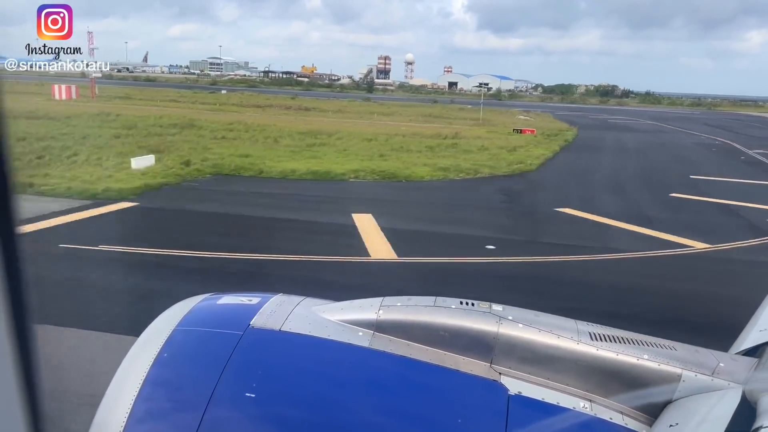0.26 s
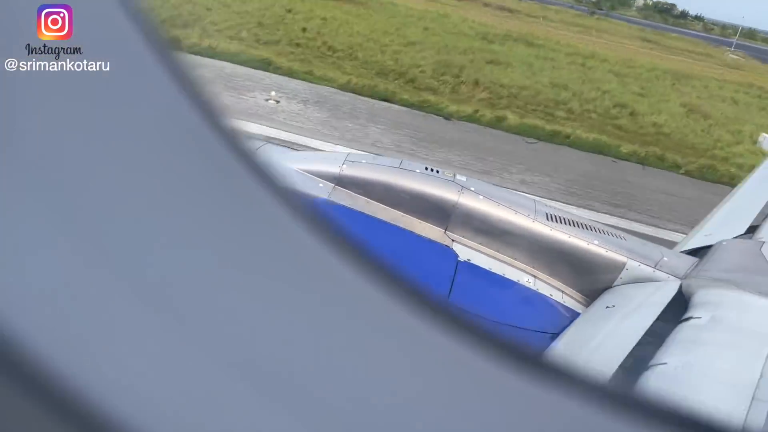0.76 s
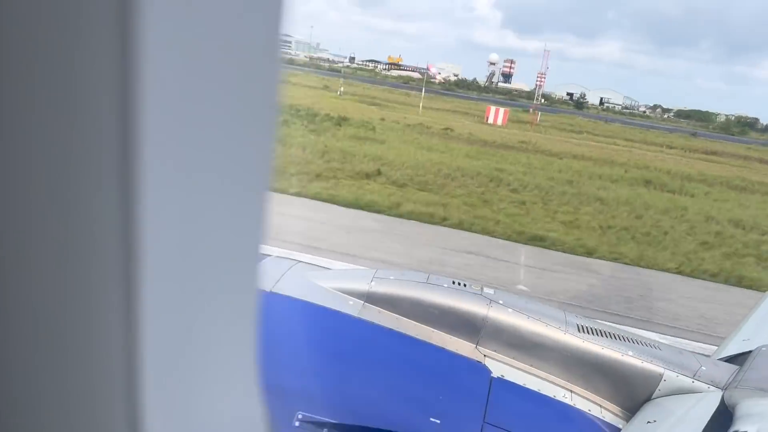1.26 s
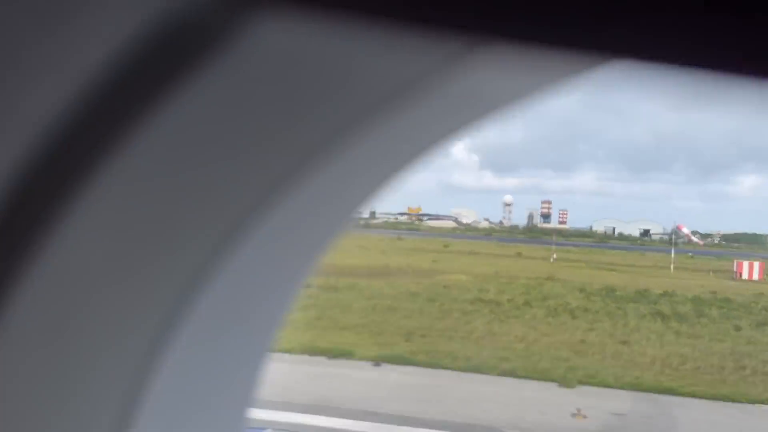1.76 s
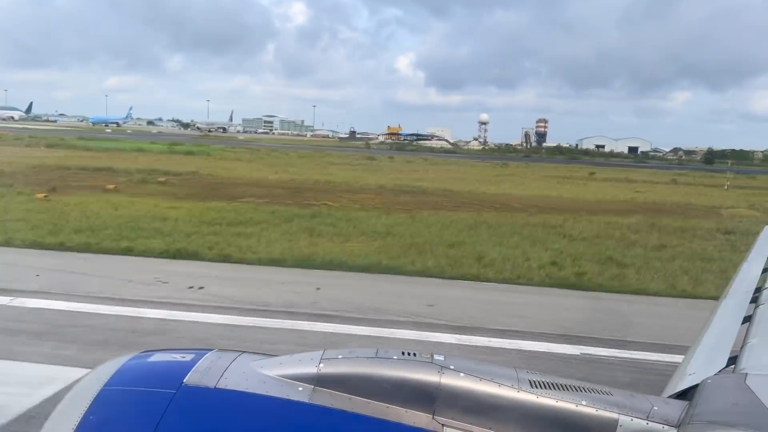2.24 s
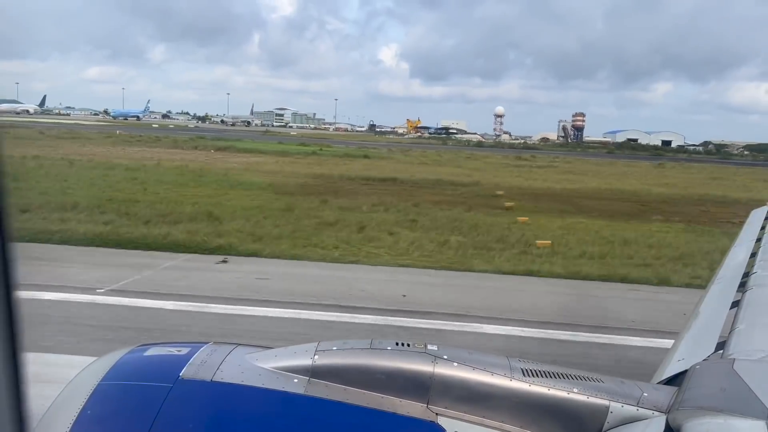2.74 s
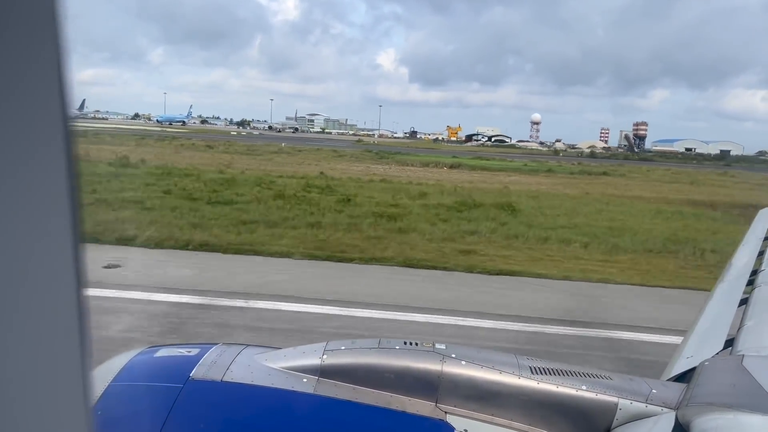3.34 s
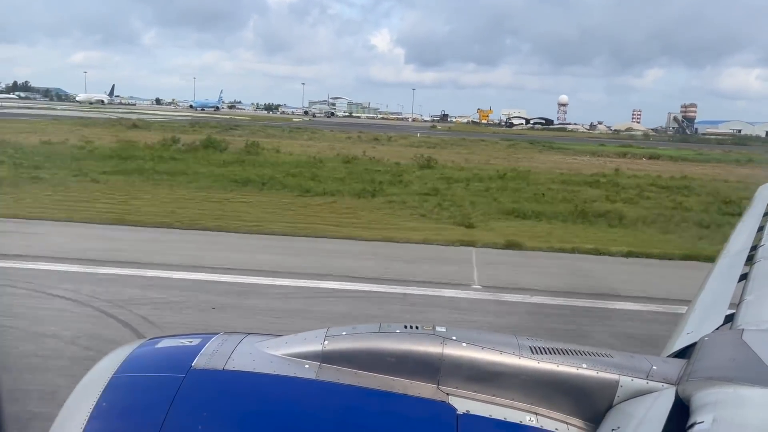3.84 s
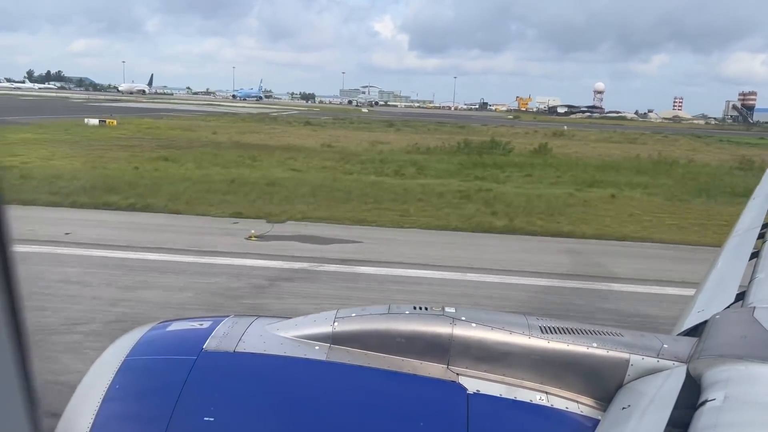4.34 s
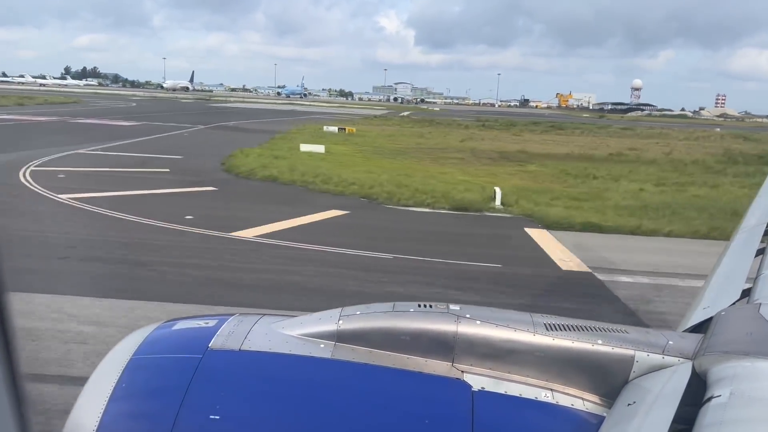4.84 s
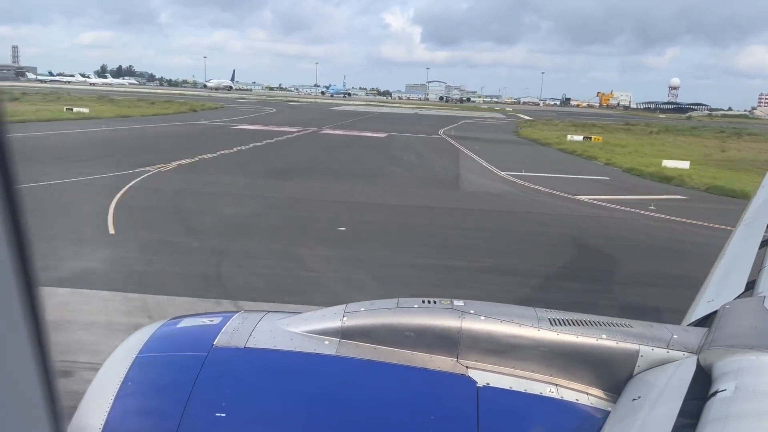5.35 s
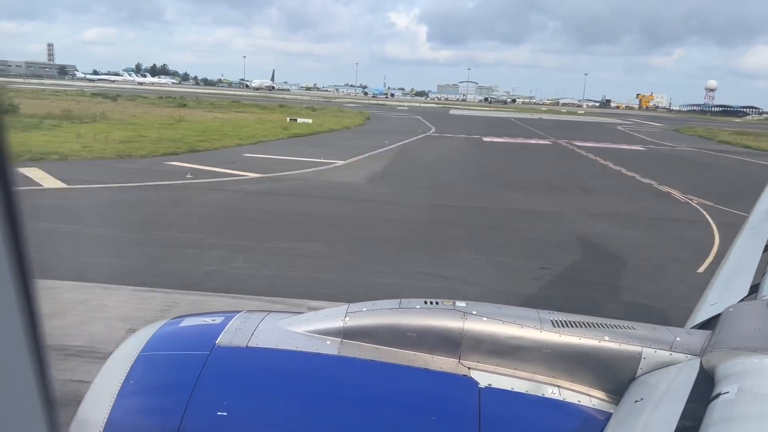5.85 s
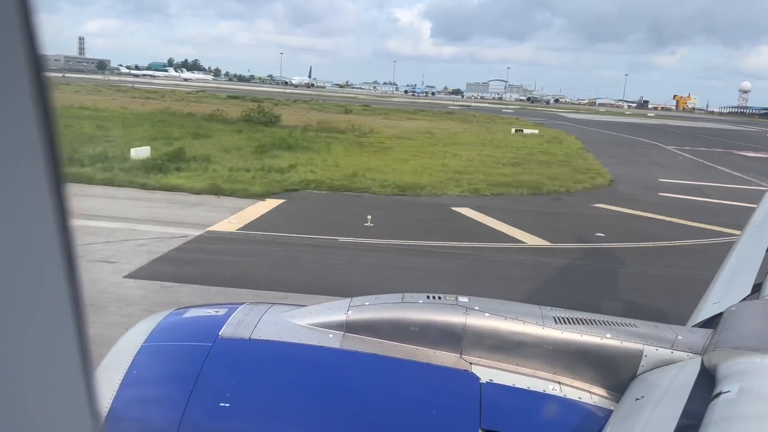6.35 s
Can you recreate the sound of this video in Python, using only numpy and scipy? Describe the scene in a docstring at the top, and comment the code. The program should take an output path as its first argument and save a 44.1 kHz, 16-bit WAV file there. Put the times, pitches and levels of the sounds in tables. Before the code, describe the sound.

Inside an airliner cabin beside the engine, rolling along a runway. Muffled jet roar and rushing air run throughout, slowly easing, with a barely audible thin whine. At 0.27 s the rumble suddenly swells; thumps, scuffing and bright plastic rattling crowd the first second, the heaviest jolt at 0.43 s and a hard, hollow bang with a tiny bounce at 0.58 s. The shaking drops around 1.3 s, then thumps return at 1.7 and 1.8 s. From 2 to 4 s, crisp knocks, ticks and short rattles scatter over the boom, strongest near 2.1, 2.4 and 3.57 s, where a low drone surges. A short squeaky chirp comes at 4.42 s. After 5 s the trim thins, and a deep sway swells near 5.4 to 5.7 s, its drone sinking in pitch; a soft jolt at 6.2 s precedes the fading rumble at 6.6 s. Close, dry stereo, squeaks left of centre.

```python
"""Airliner cabin after landing

Inside an airliner rolling along the runway, at a window beside the engine.
The wheels shake the fuselage: noise bands and gliding sine drones rumble, and decaying modes thump.
Engines and air are coloured noise with a faint sine whine. Shaken trim rattles and scuffs in grains,
knocks and bangs in ringing modes, ticks in noise bursts and squeaks in gliding sines.
A two-port microphone with a limiter hears it all."""
import sys
import numpy as np
from scipy import signal
from scipy.fft import rfft, irfft
from scipy.io import wavfile
from scipy.ndimage import uniform_filter1d, minimum_filter1d

SR = 44100
rng = np.random.default_rng(int(sys.argv[2]) if len(sys.argv) > 2 else 0)


def store_pcm(level_fs):
    """Save levels as 16-bit WAV."""
    pcm = np.round(np.clip(level_fs, -1, 1) * 32767).astype(np.int16)
    wavfile.write(sys.argv[1], SR, np.atleast_2d(pcm).T)


N = 291060
TIME, BINS = np.arange(N) / SR, np.fft.rfftfreq(N, 1 / SR)  # [s], [Hz]

# bright spectrum of the plastic trim: (frequency [Hz], level per Hz [dB])
TRIM = [(500, -17), (1500, -2.5), (3500, -5.5), (6500, 0.5), (9000, -2.5), (11500, -4), (13500, -14.5),
        (16000, 3)]


def gain_of(db):
    """Decibels to gain."""
    return 10 ** (np.asarray(db) / 20)


def evened(x):
    """Scales a signal to unit power."""
    return x / np.sqrt(np.mean(x ** 2) + 1e-20)


def read(points, hz):
    """A table's value at any frequency, interpolated along log frequency."""
    f, value = np.transpose(points)
    return np.interp(np.log(hz + 1), np.log(f + 1), value)


def curves(rows):
    """Each column of a table as a curve over the whole time."""
    s, *columns = np.transpose(rows)
    return [np.interp(TIME, s, c) for c in columns]


def add(mix, s, sound):
    """Lays a sound into the mix from time s, cut off at the mix's end."""
    part = mix[..., max(round(s * SR), 0):][..., :sound.shape[-1]]
    part += sound[..., :part.shape[-1]]


def drift(hz, size=N):
    """Slow random wander of unit power, mostly slower than hz."""
    f = np.fft.rfftfreq(size, 1 / SR)[:size // 20]
    a, b = rng.standard_normal((2, len(f)))
    return evened(irfft((a + 1j * b) * np.exp(-(f / hz) ** 2), size))


def ports(pair, colour):
    """Colours two unrelated signals and blends them as the two microphone ports hear the cabin."""
    # how alike the ports hear: (frequency [Hz], likeness [0-1])
    likeness = [(60, .996), (160, .95), (300, .88), (480, .6), (750, .25), (4000, .2), (7000, .25),
                (8400, .7), (9400, .55), (10200, .92), (16000, .85)]
    # phase by which the left port leads: (frequency [Hz], lead [rad])
    lead = [(0, 0), (430, .1), (900, 2.8), (1800, 3.1), (2500, .7), (7400, .9), (8600, 0), (9800, -3),
            (10400, -3.3), (11600, -6.2), (12700, -6.4), (13200, -9.2), (14000, -9.5), (15400, -12.5)]
    # left minus right: (frequency [Hz], level [dB])
    balance = [(60, 0), (270, -.7), (450, -2.5), (740, .5), (1220, .3), (2000, 2), (3300, 2), (5500, 6.5),
               (9000, .5), (15000, 0)]
    a, b = rfft(pair) * gain_of(read(colour, BINS))
    same = np.clip(read(likeness, BINS), 0, 1)
    right = same * a + np.sqrt(1 - same ** 2) * b
    right = right * np.exp(-1j * read(lead, BINS))
    lean = gain_of(read(balance, BINS) / 2)
    return irfft(np.array([a * lean, right / lean]), N)


def noise(colour):
    """Coloured noise of unit power at the two ports."""
    return evened(ports(rng.standard_normal((2, N)), colour))


def steadied(x, size):
    """Takes the swells slower than about size samples out of a noise."""
    power = (x ** 2).mean(0)
    smooth = uniform_filter1d(uniform_filter1d(power, size), size)
    return x / np.sqrt(smooth + 1e-9)


def patchy(x, patch_db, frames=7, bins=4):
    """Patches of the spectrum, a few hundred Hz wide, swell and fade within hundredths of a second."""
    z = signal.stft(x, nperseg=1024, noverlap=768)[2]
    patches = uniform_filter1d(rng.standard_normal(z.shape[1:]), bins, axis=0)
    patches = evened(uniform_filter1d(patches, frames, axis=1))
    shaped = z * gain_of(patch_db * patches)
    return evened(signal.istft(shaped, nperseg=1024, noverlap=768)[1][:, :N])


def cabin(x, ripple_db=1.6, width_hz=45):
    """The many cabin modes lift and lower narrow bands of a sound."""
    z, size = rfft(x), int(width_hz * N / SR)
    ripple = evened(uniform_filter1d(rng.standard_normal(z.shape), size))
    return evened(irfft(z * gain_of(ripple_db * ripple), N))


def crackle(per_s, spread_db, clump_db, t60, count=4):
    """Many tiny contacts, in clumps, each scattered briefly by the cabin."""
    size = gain_of(spread_db * np.minimum(rng.exponential(1, N), 3) + clump_db * drift(60))
    contacts = size * (rng.random(N) < per_s / SR)
    t = np.arange(SR // 40) / SR
    group = rng.integers(0, count, N)  # each contact takes one of a few scatter patterns
    scatter = rng.standard_normal((count, 2, len(t))) * gain_of(-60 * t / t60)
    return sum(signal.oaconvolve((contacts * (group == k))[None], pattern, axes=1)[:, :N]
               for k, pattern in enumerate(scatter))


def swells(rows, rest_db=-25):
    """A drone's strength: the strongest of its smooth swells, over a faint resting tone."""
    humps = [gain_of(db) * np.exp(-((TIME - s) / half) ** 2) for s, half, db in rows]
    return gain_of(rest_db) + np.max(humps, 0)


def shaking(level, colour, hz, drone, lurch_db, lurch_hz):
    """One band of lurching rumble; a wheel drone takes over part of its power as it swells."""
    level_db = curves(level)[0]
    share = np.minimum((drone / gain_of(level_db)) ** 2, 3 / 4)
    tone = np.sqrt(2) * np.sin(2 * np.pi * np.cumsum(hz) / SR)
    blend = np.sqrt(1 - share) * steadied(noise(colour), size=5000) + np.sqrt(share) * tone
    return gain_of(level_db + lurch_db * drift(lurch_hz)) * steadied(blend, size=4000)


def rumble(drone_db=-2.5, wander_hz=0.81, lower_ratio=.623):
    """The runway shakes the fuselage into a deep sway and a boom, each with its wheel drone."""
    # the upper drone sinks as the plane slows: (time [s], pitch [Hz])
    wheel_hz = [(0, 92.58), (2.4, 89.9), (3.6, 89.64), (4.95, 87.4), (5.4, 85.1), (5.8, 82.5), (6.6, 80.6)]
    # the deep sway grows as the plane slows: (time [s], level [dB])
    sway_level = [(0, -24), (.11, -25.5), (.3, -15), (1.5, -19.5), (2.1, -16.5), (4.8, -16), (5.03, -21),
                  (5.42, -10.5), (6.3, -13.5), (6.6, -18)]
    # cabin boom over rougher and smoother runway: (time [s], level [dB])
    boom_level = [(0, -20), (.22, -20.5), (.3, -11.5), (.47, -12), (1.18, -11), (1.32, -26.5), (1.62, -17),
                  (1.7, -14), (1.95, -14), (2.2, -11.5), (3.0, -13.5), (3.58, -8.5), (3.8, -13), (4.7, -15),
                  (4.95, -10.5), (6.07, -15), (6.35, -13.5), (6.6, -17)]
    # spectra of sway and boom: (frequency [Hz], level per Hz [dB])
    sway_colour = [(8, -27.5), (22, -27), (31, -17), (42, 0.5), (52, -2), (62, -1), (72, -11), (220, -120)]
    boom_colour = [(35, -50.5), (54, -14), (65, 1.5), (80, 6.5), (95, -0.5), (110, -5.5), (125, -7),
                   (150, -17), (600, -120)]
    # swells of the two drones: (crest time [s], half-length [s], level [dB])
    lower_swells = [(2.85, 0.17, -19), (5.65, 0.19, -8), (6.3, 0.68, -10)]
    upper_swells = [(.6, 0.79, -16.5), (2.35, 0.47, -14), (3.55, 0.2, -7), (5.02, 0.35, -15)]
    hz = curves(wheel_hz)[0] + wander_hz * drift(8.1)
    lower_drone = gain_of(drone_db) * swells(lower_swells)
    upper_drone = gain_of(drone_db) * swells(upper_swells)
    sway = shaking(sway_level, sway_colour, hz * lower_ratio, lower_drone, lurch_db=1.4, lurch_hz=18)
    boom = shaking(boom_level, boom_colour, hz, upper_drone, lurch_db=2.0, lurch_hz=10)
    return sway + boom


def engines(rush_db=2.0, air_db=-45.5, air_follows=0.56, flutter_db=1.26, waver_db=7.0, whine_hz=3786):
    """Jet roar and rushing air through the cabin wall, with a faint turbine whine."""
    # engines and rushing air: (time [s], low roar level [dB], rush level [dB])
    power = [(0, -17, -33), (.7, -16, -29.5), (1.15, -18.5, -32.5), (1.5, -19.5, -35), (2.2, -18.5, -34),
             (3.1, -19, -36.5), (3.8, -17.5, -34), (4.8, -18.5, -37), (5.2, -18, -37), (6.1, -20, -37.5),
             (6.6, -20.5, -38.5)]
    # spectra of low roar, rush and bright air: (frequency [Hz], level per Hz [dB])
    roar_colour = [(70, -40.5), (110, 1.5), (130, 0), (155, 0), (205, -3.5), (260, -6.5), (320, -6.5),
                   (400, -13), (480, -21.5), (650, -32), (4000, -120)]
    rush_colour = [(250, -20.5), (400, -2), (510, 0.5), (660, -10), (770, -6.5), (870, -10.5), (1150, -18),
                   (1600, -23.5), (12000, -100)]
    air_colour = [(600, 6.5), (1150, -3.5), (1380, 2.5), (1650, 1.5), (2020, 6), (2220, 0), (2620, -1),
                  (2850, -7.5), (3150, -7), (3450, -11), (4000, -12.5), (5300, -14.5), (7000, -19.5),
                  (10000, -23), (16000, -35)]
    # thin engine whine: (time [s], level [dB])
    whine_level = [(0, -93), (1.4, -74), (2.6, -78), (3.45, -67.5), (4, -85), (6.6, -78.5)]
    low_db, mid_db = curves(power)
    roar = gain_of(low_db) * steadied(noise(roar_colour), size=9000)
    rush_level = mid_db + rush_db + flutter_db * drift(25)
    rush = gain_of(rush_level) * patchy(cabin(noise(rush_colour)), patch_db=1.5)
    air_level = air_db + air_follows * (mid_db - mid_db.mean()) + flutter_db * drift(5.1)
    air = gain_of(air_level) * patchy(cabin(noise(air_colour)), patch_db=2.5)
    whine_gain = gain_of(curves(whine_level)[0] + waver_db * np.tanh(drift(14)))
    whine = whine_gain * np.sin(2 * np.pi * np.cumsum(whine_hz + 6 * drift(30)) / SR)
    return roar + rush + air + whine


def chatter(attack_s=0.0045, t60=0.2):
    """How hard the trim chatters, in dB: each fit rises, holds and dies back into the steady chatter."""
    # steady chatter of the loose trim: (time [s], level [dB])
    chatter_level = [(0, -70.5), (.26, -74), (.34, -53), (.7, -56), (.92, -56), (1.4, -68), (1.85, -56),
                     (2.6, -67.5), (3.1, -56.5), (3.3, -64), (3.95, -54.5), (4.5, -52.5), (5.0, -60.5),
                     (5.4, -58), (6.3, -64.5), (6.6, -61)]
    # shiver around the hardest knock: (time [s], level [dB])
    shiver_level = [(.56, -80), (.577, -44), (.587, -40.5), (.602, -43), (.625, -62), (.66, -90)]
    # fits of rattling: (time [s], length [s], level [dB])
    fits = [(0.289, .006, -55), (0.307, 0.029, -48), (.464, 0.023, -49.5), (0.523, .012, -51.5),
            (0.655, 0.013, -49), (0.676, 0.038, -49), (0.729, 0.03, -48), (0.787, 0.02, -46),
            (1.834, 0.035, -58.5), (1.968, .015, -52.5), (2.073, 0.02, -57), (2.222, 0.017, -60.5),
            (2.42, 0.016, -58), (2.825, 0.026, -51.5), (3.038, 0.048, -56), (3.392, 0.02, -51.5),
            (3.564, 0.029, -52), (3.764, 0.012, -50.5), (3.956, 0.022, -50.5), (4.126, .025, -54.5),
            (4.42, 0.035, -49.5), (5.384, 0.034, -53), (5.494, 0.027, -54), (6.545, 0.0095, -52)]
    power = gain_of(curves(chatter_level)[0]) ** 2 + gain_of(curves(shiver_level)[0]) ** 2
    t = np.arange(SR // 2) / SR
    for s, length, db in fits:
        rise = np.minimum(t / attack_s, 1)
        release_db = -60 * np.maximum(t - length, 0) / t60
        add(power, s, (rise * gain_of(db + release_db)) ** 2)
    return 10 * np.log10(power)


def rattle(chatter_db, level_db=6.5):
    """The fine, bright chatter of loose trim: dense grains that follow the chatter level."""
    # spectrum of the chattering trim: (frequency [Hz], level per Hz [dB])
    rustle = [(500, -7.5), (1300, 12), (2200, 10.5), (2700, 6), (3200, 0.5), (5300, 2), (7000, 1),
              (9000, -2.5), (11500, -5.5), (13500, -6.5), (16000, -10.5)]
    grains = crackle(per_s=900, spread_db=0.5, clump_db=0.7, t60=0.025, count=10)
    grains = patchy(ports(grains, rustle), patch_db=2.0, frames=4, bins=9)
    return gain_of(chatter_db + level_db) * steadied(grains, size=3000)


def scuffs():
    """Coarser, duller grains where panels rub; each scuff swells and fades."""
    # trim scuffing against trim: (time [s], length [s], level [dB])
    rubs = [(0.264, 0.42, -37.5), (.6, 0.38, -39), (2.07, 0.12, -44), (5.31, 0.12, -42)]
    # spectrum of the scuffing: (frequency [Hz], level per Hz [dB])
    scuff_colour = [(300, -18), (600, -2), (900, 6), (1200, 2), (1600, -7.5), (2000, -6), (2500, -16),
                    (3100, -20), (8000, -32)]
    strength = np.zeros(N)
    for s, length, db in rubs:
        add(strength, s, gain_of(db) * signal.windows.tukey(int(length * SR), .7))
    grains = crackle(per_s=340, spread_db=-1.5, clump_db=4.5, t60=0.025)
    return strength * steadied(evened(ports(grains, scuff_colour)), size=3000)


def jolts(level_db=-1, rise_s=0.0056):
    """A wheel meets a joint in the runway and the fuselage thumps, alike at both ports."""
    # jolts of the wheels, before the common level: (time [s], level [dB])
    joints = [(0.273, -11), (.428, 0.5), (0.527, -8.5), (.578, -5), (0.767, -2), (1.677, -3), (1.791, -4.5),
              (6.207, -6)]
    # ring of the fuselage: (frequency [Hz], level [dB], t60 [s])
    fuselage_modes = [(55.4, -5.5, 0.73), (83.05, 1, 0.4), (121.5, -8, 0.19), (267, -10.5, 0.073)]
    out, t = np.zeros(N), np.arange(SR // 3) / SR
    hz, db, t60 = np.transpose(fuselage_modes)[:, :, None]
    for s, jolt_db in joints:
        detuned = hz * rng.uniform(.92, 1.08, hz.shape)
        phases = 2 * np.pi * (detuned * t + rng.random(hz.shape))
        ring = (gain_of(db - 60 * t / t60) * np.sin(phases)).sum(0)
        add(out, s, gain_of(jolt_db + level_db) * (1 - np.exp(-t / rise_s)) * ring)
    return out


def panel_ring(focus_hz, low_focus_db=12, focus_db=5, focus_octaves=0.22):
    """One blow on a panel at each port: decaying modes, those near focus_hz raised, the low ones more."""
    # ring of a cabin panel: (frequency [Hz], level [dB], t60 [s])
    panel_modes = [(390, -3, .025), (580, 1, .018), (720, -3, .014), (1030, -6, .018), (1170, -3, .026),
                   (1450, -6, .016), (1780, -7, .016), (2080, -8, .018), (2600, -12, .02),
                   (3400, -19, .018)]
    t = np.arange(3000) / SR
    hz, db, t60 = np.transpose(panel_modes)[:, :, None]
    low = 1 / (1 + (hz / 850) ** 6)
    near = np.exp(-(np.log2(hz / focus_hz) / focus_octaves) ** 2)
    sizes = gain_of(db + (low_focus_db * low + focus_db) * near - 60 * t / t60)
    detuned = hz * rng.uniform(.93, 1.07, hz.shape)
    phases = 2 * np.pi * (detuned * t + rng.random((2, len(hz), 1)))
    ring = (sizes * np.sin(phases)).sum(1) * (1 - np.exp(-t / .0008))
    return ring / np.sqrt(np.mean(ring[:, :200] ** 2))  # unit power over the onset


def knocks(chatter_db, level_db=-2, small_db=-50, spread_db=1.5, taps_follow=0.39,
           click_db=-11, click_t60=0.011, count=140):
    """Loose panels click and ring, among small taps that grow with the chatter."""
    # knocks, before the common level: (time [s], level [dB], strongest ring [Hz])
    blows = [(0.278, -25.5, 706), (0.3302, -28, 1400), (.403, -32.5, 2400), (0.471, -34, 1500),
             (0.528, -42, 1300), (0.5987, -25.5, 2500), (.629, -32, 1220), (0.6704, -39, 1490),
             (0.8, -34, 2000), (0.978, -33, 1500), (1.002, -29, 1500), (1.571, -36.5, 724),
             (1.676, -35.5, 900), (1.774, -31, 1000), (1.899, -37, 750), (2.0414, -33, 1360),
             (2.1, -29, 1450), (2.1066, -25, 1800), (2.181, -32, 1400), (2.247, -33, 1400),
             (2.309, -39, 700), (2.327, -31.5, 715), (2.3756, -33, 1400), (2.4251, -25, 1450),
             (2.687, -36.5, 890), (2.8713, -29.5, 1950), (3.053, -36, 724), (3.0857, -33, 1450),
             (3.111, -33.5, 1450), (3.203, -31, 1350), (3.218, -32, 1450), (3.572, -24, 1600),
             (3.5932, -26.5, 1420), (3.311, -35, 1500), (3.675, -33.5, 780), (3.789, -36, 1450),
             (3.946, -33, 1510), (4.904, -32.5, 750), (5.069, -34, 765), (5.214, -31, 760),
             (5.331, -37, 1400), (5.6031, -34, 1430), (5.6636, -34, 1200), (6.006, -43, 750)]
    # softer knocks ring lower and click less: (strongest ring [Hz], click level [dB])
    hardness = [(750, -9), (1400, -0.5), (2000, 3)]
    # spectrum of the click as a panel makes contact: (frequency [Hz], level per Hz [dB])
    click_colour = [(500, 0), (1500, 16), (2300, 5), (3600, 1), (6000, -2.5), (11000, -8.5)]
    out, clicks, t = np.zeros((2, N)), np.zeros((2, N)), np.arange(2000) / SR
    for s, db, hz in blows:
        add(out, s, gain_of(db + level_db) * panel_ring(hz))
        fade = gain_of(db + click_db + read(hardness, hz) - 60 * t / click_t60)
        add(clicks, s, fade * rng.standard_normal((2, len(t))))
    out += ports(clicks, click_colour)
    for at in rng.integers(0, N, count):
        follow_db = taps_follow * (chatter_db[at] - chatter_db.mean())
        db = small_db + follow_db + spread_db * min(rng.exponential(), 3)
        add(out, at / SR, gain_of(db) * panel_ring(rng.uniform(1400, 2100)))
    return out


def ticks(level_db=-7, t60=0.05, tail_db=-14, tail_t60=0.082, rise_s=0.0005):
    """Each tick is a short dense ring of plastic, followed by the dry cabin's tail."""
    # ticks of plastic fittings, before the common level: (time [s], level [dB])
    fittings = [(0.314, -34), (.329, -33), (.385, -31), (.487, -26.5), (.6644, -34.5), (.74, -30.5),
                (.795, -30), (.812, -33.5), (0.941, -37.5), (1.003, -36.5), (1.04, -35.5), (1.2058, -37.5),
                (1.5937, -36.5), (1.773, -37), (1.9691, -33.5), (2.103, -31), (2.229, -32), (2.388, -38),
                (2.4237, -33), (2.8686, -37), (2.996, -33), (3.0605, -31), (3.2, -43), (3.2171, -36),
                (3.3978, -36.5), (3.5722, -29.5), (3.772, -28), (4.716, -33), (5.332, -36), (5.419, -42.5),
                (5.8567, -35)]
    out, t = np.zeros((2, N)), np.arange(8000) / SR
    decay = gain_of(-60 * t / t60) + gain_of(tail_db - 60 * t / tail_t60)
    shape = (1 - np.exp(-t / rise_s)) * decay
    for s, db in fittings:
        add(out, s, gain_of(db + level_db) * shape / shape.max() * rng.standard_normal((2, len(t))))
    power = np.mean(out ** 2)
    out = np.sqrt(power) * patchy(out, patch_db=5.0, frames=14, bins=12)  # varies the colour of the ticks
    return ports(out, TRIM) / np.sqrt(np.mean(gain_of(read(TRIM, BINS)) ** 2))


def squeaks(right_db=-7, stutter_db=2.0, sag_hz_per_s=640):
    """Stick and slip between panels: stuttering whistles, left of centre; longer rubs sag deeper midway."""
    # trim rubbing on trim: (time [s], length [s], start [Hz], end [Hz], relative level [dB], wander [Hz])
    rubs = [(0.48, .012, 7700, 7500, -46, 300), (0.517, .014, 7000, 6400, -50, 400),
            (1.17, 0.065, 1274, 1220, -47, 40), (1.513, 0.015, 6100, 6050, -55, 150),
            (1.572, 0.1, 1350, 1320, -47.5, 22), (1.733, 0.085, 1120, 1020, -45, 30),
            (1.894, .014, 3580, 3650, -54, 150), (2.435, 0.011, 5400, 5500, -50, 250),
            (2.499, .12, 2490, 2460, -57, 45), (3.049, 0.13, 3340, 3220, -55, 45),
            (4.104, 0.067, 3150, 3080, -55, 70), (4.121, 0.075, 4900, 4970, -55, 200),
            (4.414, 0.015, 4900, 4950, -46, 240), (4.424, 0.0086, 5300, 5110, -35.5, 170),
            (4.805, .008, 4950, 4950, -54, 230), (4.925, 0.04, 2980, 2860, -56, 120),
            (5.108, 0.016, 4670, 4740, -49, 60), (5.109, .016, 5350, 5450, -51, 110),
            (5.438, .08, 3270, 3240, -59, 20), (5.753, 0.23, 3440, 3440, -65, 6)]
    out = np.zeros(N)
    for s, length, start_hz, end_hz, db, width in rubs:
        n = int(length * SR)
        sag = sag_hz_per_s * length * np.sin(np.linspace(0, np.pi, n))
        hz = np.linspace(start_hz, end_hz, n) - sag + width * drift(2 * width, size=SR)[:n]
        grip = evened(gain_of(stutter_db * drift(90, size=SR)[:n]))
        whistle = np.sin(2 * np.pi * np.cumsum(hz) / SR)
        add(out, s, gain_of(db) * 2 * grip * signal.windows.tukey(n, .7) * whistle)
    return np.array([out, out * gain_of(right_db)])


def bang(ring_db=-3.5, crack_db=-15.5, crack_t60=0.0024):
    """The hardest knock grazes, strikes and bounces twice: each a hollow ring with a brief bright crack."""
    # contacts of the panel, relative to the loudest: (time [s], level [dB])
    bounces = [(.5805, -14), (.5834, -5), (.5848, 0), (.5864, -3)]
    # what it rings with: (frequency [Hz], level [dB], t60 [s])
    bang_modes = [(410, -6, .024), (590, -8, .013), (1130, -10, .014), (1600, -13, .007), (2000, -19, .014),
                  (2630, -22, .018), (3930, -30, .008)]
    ring, crack, t = np.zeros((2, N)), np.zeros((2, N)), np.arange(2000) / SR
    hz, db, t60 = np.transpose(bang_modes)[:, :, None]
    soft = np.minimum(t / .0002, 1)  # brief onset ramp
    for s, blow_db in bounces:
        phases = 2 * np.pi * (hz * t + .12 * rng.standard_normal((2, len(hz), 1)))
        modes = (gain_of(db - 60 * t / t60) * np.sin(phases)).sum(1)
        add(ring, s, gain_of(ring_db + blow_db) * soft * modes)
        fade = gain_of(crack_db + blow_db - 60 * t / crack_t60)
        add(crack, s, fade * rng.standard_normal((2, len(t))))
    return ring + ports(crack, TRIM)


def scene():
    """Rumble, jolts and engine roar, with the small noises of the shaken trim on top."""
    chatter_db = chatter()
    shaken = rumble() + jolts()
    trim = rattle(chatter_db) + scuffs() + knocks(chatter_db) + ticks() + bang() + squeaks()
    return shaken + engines() + trim


def record(dry, ceiling=.94, edge_hz=15850):
    """A fast limiter holds the crests under full scale; then a low-pass sets the band limit."""
    allowed = np.minimum(1, ceiling / (abs(dry).max(0) + 1e-9))
    limited = dry * uniform_filter1d(minimum_filter1d(allowed, size=500), size=500)
    low_pass = signal.firwin(511, edge_hz, window=("kaiser", 9), fs=SR)
    return signal.oaconvolve(limited, low_pass[None], "same")


dry = scene()
out = record(dry)
store_pcm(out)
```